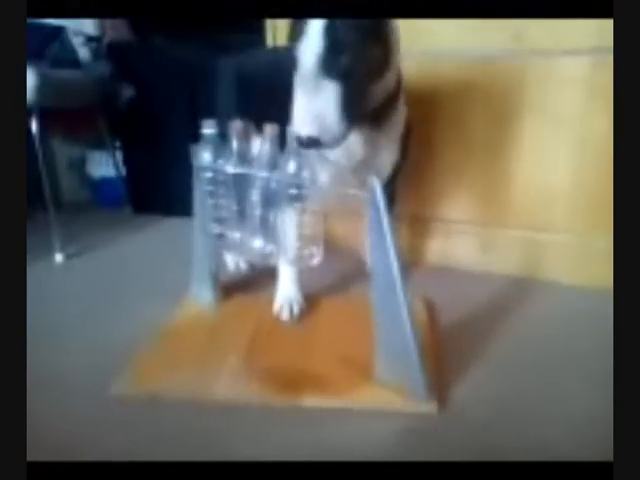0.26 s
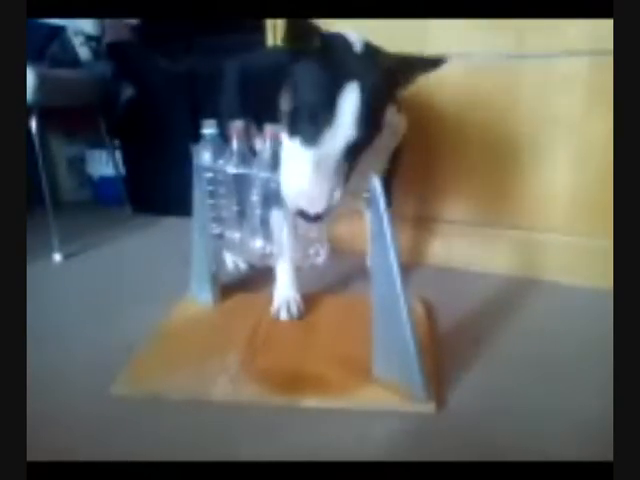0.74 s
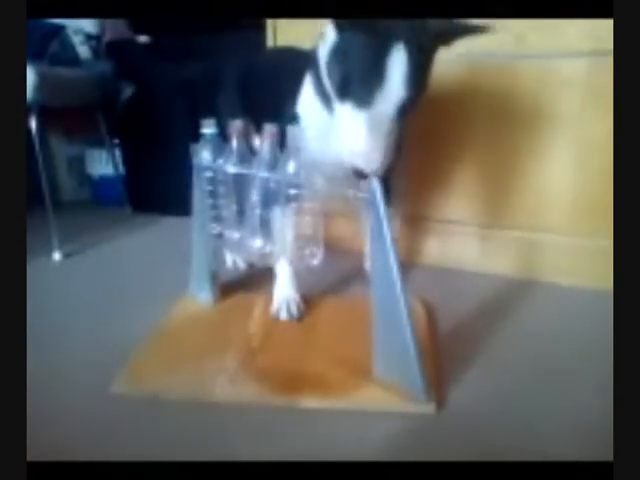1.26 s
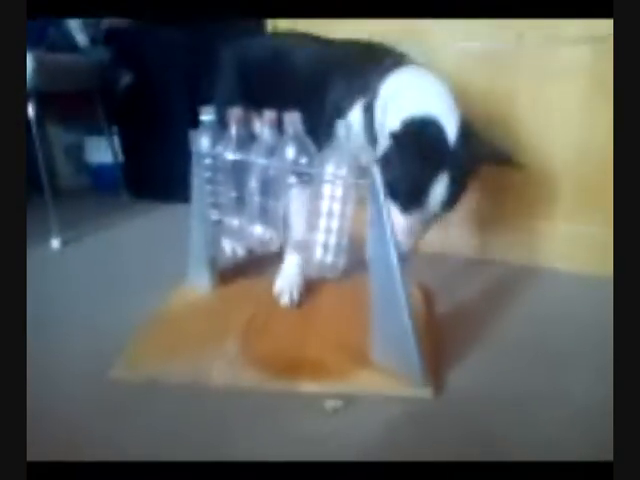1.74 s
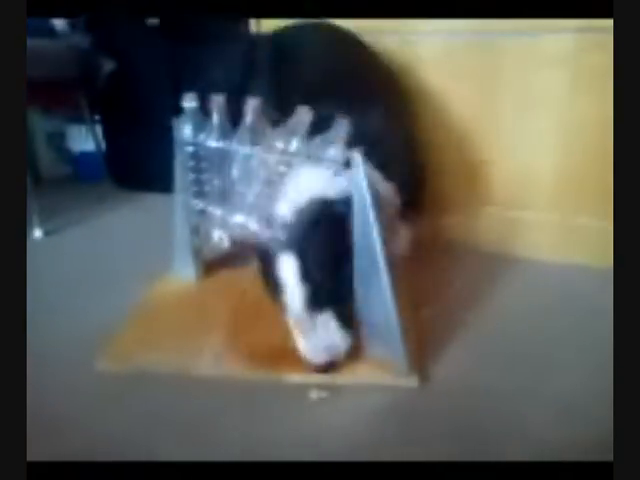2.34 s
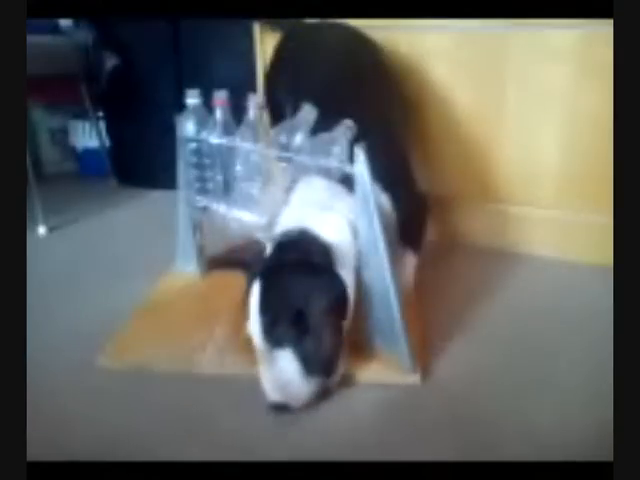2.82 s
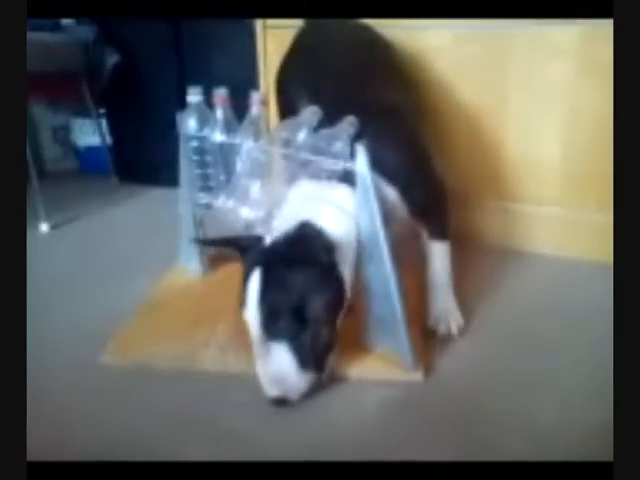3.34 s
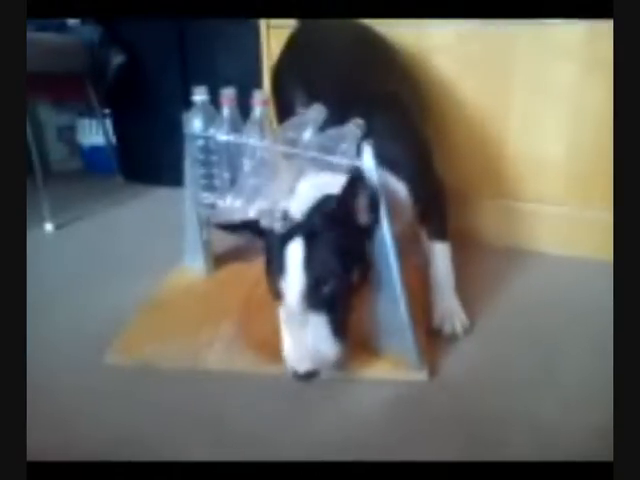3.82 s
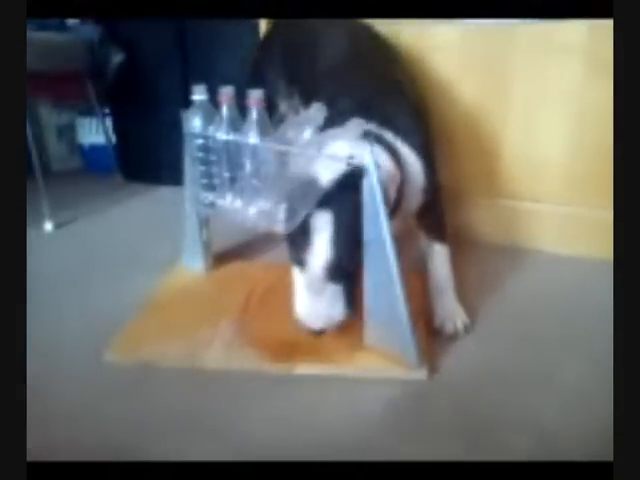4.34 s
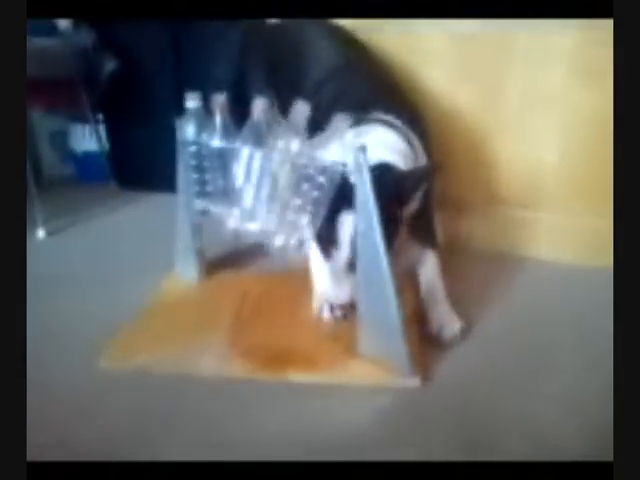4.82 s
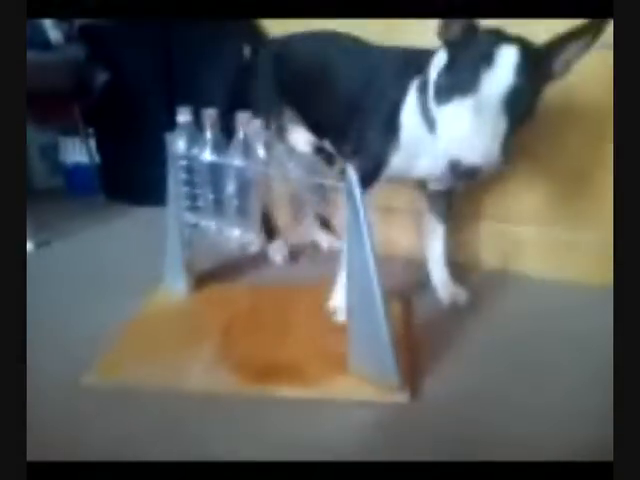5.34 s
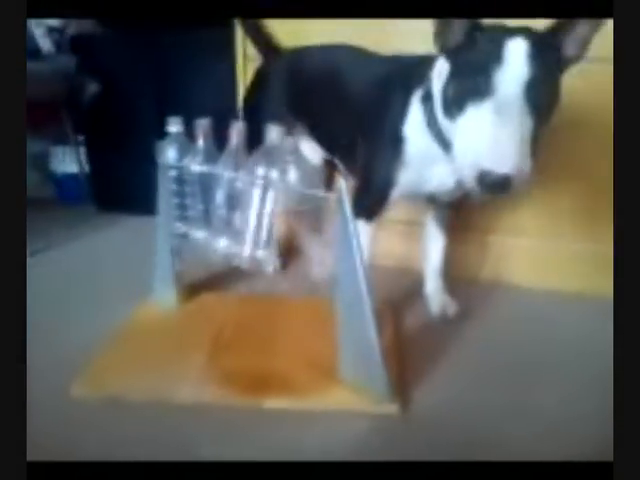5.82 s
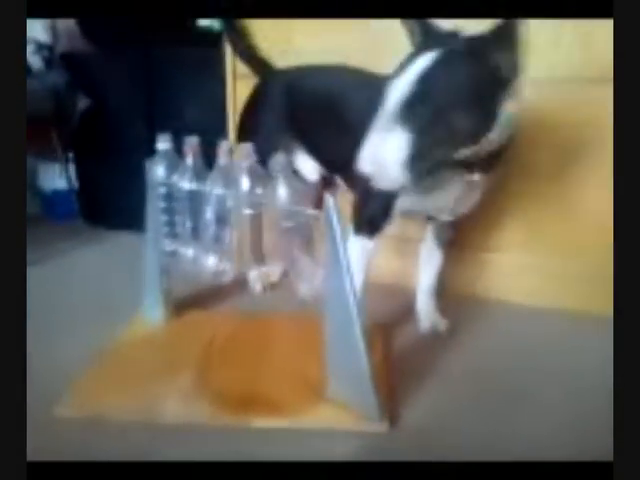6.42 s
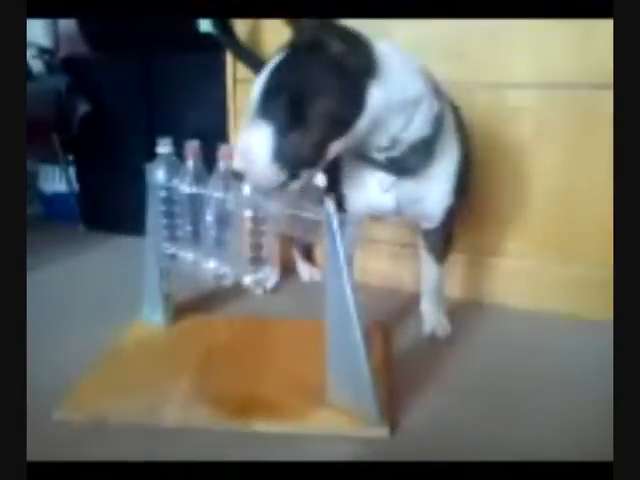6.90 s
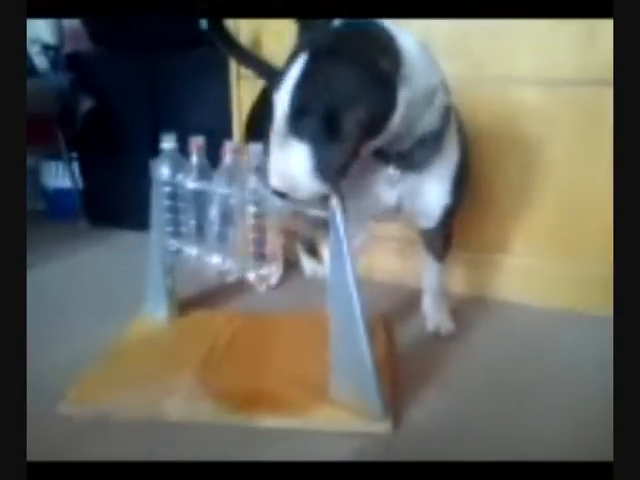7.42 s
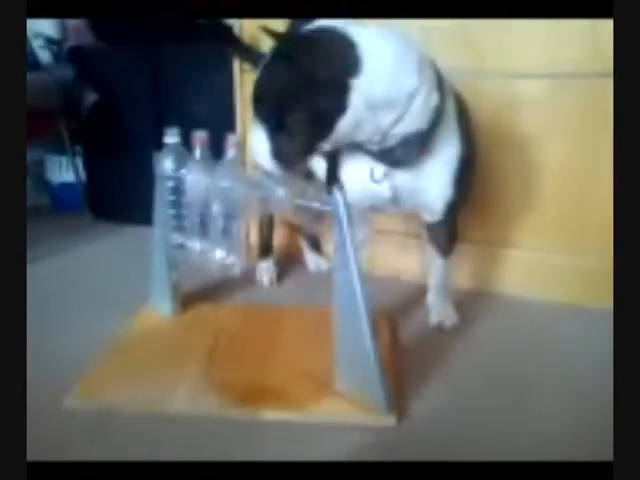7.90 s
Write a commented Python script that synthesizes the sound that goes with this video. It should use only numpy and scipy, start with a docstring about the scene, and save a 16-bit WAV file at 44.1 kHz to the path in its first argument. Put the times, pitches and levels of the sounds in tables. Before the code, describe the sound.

Empty plastic bottles knock and clatter on a metal rod as a dog pushes through, muffled and distorted, over low room drone in a small room.

```python
"""Dog among hanging bottles

A dog pushes through a row of empty plastic bottles hung on a metal rod, in a small room.
Thin shells knock (shaped noise plus one ringing mode), chatter on the rod (runs of taps into resonators)
and rub along the coat (hiss and ticks); the wooden base thumps (decaying sines). A low noise drone fills the room.
The narrow-band recorder overloads on the hardest knocks and turns itself down after them."""
import sys
import numpy as np
from scipy import signal
from scipy.fft import rfft, irfft
from scipy.io import wavfile
from scipy.ndimage import uniform_filter1d

SR = 44100
rng = np.random.default_rng(int(sys.argv[2]) if len(sys.argv) > 2 else 0)


def pcm_store(signal):
    """Save signal as 16-bit PCM."""
    levels = np.round(np.clip(np.atleast_2d(signal), -1, 1) * 32767)
    wavfile.write(sys.argv[1], SR, levels.astype(np.int16).T)


N = 359415


def gain_of(db):
    """Decibels to amplitude."""
    return 10 ** (np.asarray(db) / 20)


def evened(x):
    """Scales to an rms of one."""
    return x / np.sqrt(np.mean(x ** 2) + 1e-20)


def read(points, hz, axis=1):
    """One column of a spectrum table, joined by lines over log frequency."""
    table = np.array(points)
    return np.interp(np.log(hz + 1), np.log(table[:, 0] + 1), table[:, axis])


def level(curve):
    """A (time [s], level [dB]) curve as a gain for every sample."""
    return gain_of(np.interp(np.arange(N) / SR, *np.transpose(curve)))


def add(mix, start_s, sound):
    """Lays a sound into the mix at start_s, trimmed to the mix."""
    start = round(start_s * SR)
    sound = sound[max(-start, 0):]
    part = mix[max(start, 0):][:len(sound)]
    part += sound[:len(part)]


def coloured(x, points):
    """Filters x by a spectrum table, with zero phase."""
    hz = np.fft.rfftfreq(len(x), 1 / SR)
    return irfft(rfft(x) * gain_of(read(points, hz)), len(x))


def causal(x, db):
    """Filters x by a dB response at minimum phase, so it rings only after it is struck."""
    cepstrum = irfft(np.log(gain_of(db)))
    cepstrum[1:len(x) // 2] *= 2
    cepstrum[len(x) // 2 + 1:] = 0
    return irfft(rfft(x) * np.exp(rfft(cepstrum)))


def wander(per_s):
    """Slow random curve of unit rms, per_s corner points a second."""
    points = rng.standard_normal(int(N / SR * per_s) + 2)
    return evened(np.interp(np.arange(N) / SR * per_s, np.arange(len(points)), points))


# dull bumps on base or belly: (time [s], level [dB], frequency [Hz], decay to 1/e [s])
BUMPS = [(0.0, -18.5, 148.5, 0.12), (0.033, -4, 598, 0.011), (0.199, -13, 138, .04),
         (0.304, -7.5, 292, .025), (0.378, -1, 620, 0.012), (2.436, -10, 297, 0.03),
         (2.611, -0.5, 182, .012), (2.652, -4.5, 140.6, 0.05), (2.696, -6.5, 133.3, 0.035),
         (4.315, -11.5, 443.5, .022), (4.452, -14.5, 690, 0.012), (4.58, -24, 430, 0.083),
         (5.11, -19.5, 330, .02), (6.7, -21, 488, 0.029), (6.941, -16.5, 428, 0.037),
         (7.51, -26.5, 430, 0.059), (8.009, -15, 299, 0.018)]


def thumps(rise_s=0.00063):
    """The wooden base or a bottle's belly answers a push with a few low cycles."""
    out, t = np.zeros(N), np.arange(SR // 2) / SR
    for start_s, db, hz, decay_s in BUMPS:
        envelope = (1 - np.exp(-t / rise_s)) * np.exp(-t / decay_s)
        add(out, start_s, gain_of(db) * envelope * np.sin(2 * np.pi * hz * t))
    return out


# coat rubbing on plastic, relative: (time [s], level [dB])
RUB_LEVEL = [(0.0, -26), (0.2, -47), (0.38, -7.5), (0.58, -32), (0.85, -40), (1.18, -20), (1.45, -37.5),
             (2.4, -35), (2.65, -25), (3.13, -20), (3.35, -36), (4.3, -26.5), (4.5, -34.5), (5.4, -29.5),
             (5.8, -33.5), (6.9, -35.5), (7.27, -26.5), (7.6, -39.5)]
# relative rub spectrum: (frequency [Hz], density [dB per Hz])
RUB_SPECTRUM = [(100, -18.5), (400, 1.5), (800, -2), (1150, 3), (1600, 1), (2100, 0.5), (2700, -2.5),
                (3300, -9), (4000, -10)]
# short slides of a bottle along the dog: (time of peak [s], level [dB], half length to 1/e [s])
SLIDES = [(0.954, -20.5, 0.037), (2.427, -19.5, 0.0079), (3.53, -21, 0.057), (4.321, -20, 0.021),
          (4.378, -21.5, 0.034), (4.598, -23.5, 0.03), (5.114, -19.5, 0.0097), (6.394, -27, 0.057),
          (6.68, -43, 0.015), (7.086, -26, 0.016), (7.12, -20.5, 0.005), (7.577, -21, 0.025)]


def rub(rub_db=1, grains_per_s=220, grain_db=-5, spread_db=3, uneven_db=1):
    """Hair hisses over the plastic, with small random ticks where it catches; a slide swells it."""
    t = np.arange(N) / SR
    tick_gain = gain_of(spread_db * np.minimum(rng.exponential(1, N), 4))
    ticks = (rng.random(N) < grains_per_s / SR) * tick_gain
    hiss = rng.standard_normal(N) * gain_of(uneven_db * wander(per_s=26))
    friction = coloured(hiss + gain_of(grain_db) * evened(ticks), RUB_SPECTRUM + [(6000, -40.0)])
    slides = sum(gain_of(db) * np.exp(-((t - peak_s) / half_s) ** 2) for peak_s, db, half_s in SLIDES)
    return np.hypot(gain_of(rub_db) * level(RUB_LEVEL), slides) * evened(friction)


# rumble and tones together: (time [s], level [dB])
DRONE_LEVEL = [(0.2, -20), (0.6, -29), (0.85, -29), (1.2, -30), (2.0, -26.5), (2.8, -26.5), (3.1, -33.5),
               (3.4, -27), (4.33, -28), (4.44, -35), (4.65, -33.5), (5.25, -27), (5.55, -35.5), (6.05, -29),
               (7.05, -30.5), (7.35, -41), (7.9, -32.5), (8.15, -37.5)]
# relative rumble spectrum: (frequency [Hz], density [dB per Hz])
RUMBLE_SPECTRUM = [(15, -53.5), (30, -39.5), (57, -16), (88, -14), (112, 0), (138, 2.5), (185, -9),
                   (225, -8.5), (255, -7.5), (290, -10), (400, -14.5), (800, -15), (3000, -40.5)]
# faint tones before their fade: (mean frequency [Hz], level against the rumble [dB])
TONES = [(140, -11.5), (150, -14.5), (188, -9.5), (226, -12), (283, -10), (338, -24), (393, -17)]
# fall of the tones part way through: (time [s], level [dB])
TONE_FADE = [(2.5, 1.5), (3.2, -5)]
HUM_HZ, HUM_DB = 120.3, -40.5


def drone(rumble_db=0, tones_db=0, waver_db=4.0, drift_hz=1.2):
    """A low noise rumble with wavering, drifting tones in it, over a wavering mains hum."""
    sound = gain_of(rumble_db) * evened(coloured(rng.standard_normal(N), RUMBLE_SPECTRUM))
    fade = level(TONE_FADE)
    for hz, db in TONES:
        turns = np.cumsum(hz + drift_hz * wander(per_s=5)) / SR
        tone = evened(np.sin(2 * np.pi * turns) * gain_of(waver_db * wander(per_s=4)))
        sound += gain_of(tones_db + db) * fade * tone
    hum = evened(np.sin(2 * np.pi * HUM_HZ * np.arange(N) / SR))
    return level(DRONE_LEVEL) * sound + gain_of(HUM_DB + waver_db * wander(per_s=6)) * hum


# NUDGE_DB is over the rub level curve, give or take up to NUDGE_SPREAD_DB
NUDGES_PER_S, NUDGE_DB, NUDGE_SPREAD_DB = 6, 12, 5.5
NUDGE_BOOM_DB, NUDGE_SNAP_DB = -10.5, -20.5
NUDGE_LOW_HZ, NUDGE_HIGH_HZ = 654.6, 2680


def nudges(count=120):
    """Knock rows for light touches at random times, their strength following the rubbing."""
    draws = rng.random((count, 3))
    times_s = np.cumsum(-np.log(1 - draws[:, 0])) / NUDGES_PER_S
    scatter_db = NUDGE_SPREAD_DB * (2 * draws[:, 1] - 1)
    levels_db = np.interp(times_s, *np.transpose(RUB_LEVEL)) + NUDGE_DB + scatter_db
    modes_hz = NUDGE_LOW_HZ * (NUDGE_HIGH_HZ / NUDGE_LOW_HZ) ** draws[:, 2]
    return [(start_s, db, hz, NUDGE_BOOM_DB, NUDGE_SNAP_DB)
            for start_s, db, hz in zip(times_s, levels_db, modes_hz) if start_s < N / SR]


# bottles knocking together: (time [s], level before the crest allowance [dB], strongest shell mode [Hz],
# boom of the belly [dB], snap of the shoulder [dB])
CONTACTS = [(0.001, -7, 2110, -5, -12), (0.033, -9.5, 2180, -4, -19), (0.044, 0.5, 2167, -14, -21.5),
            (0.146, 1.5, 2100, -18.5, -22.5), (0.299, 3, 1110, -10.5, -20), (0.339, 1.5, 2623, -17, -10.5),
            (0.366, -5.5, 1143, -6, -17), (0.376, 0, 2530, -13.5, -11), (0.404, -0.5, 1224, -2, -20),
            (0.482, 2.5, 2030, -25, -15.5), (0.683, -19.5, 1660, -16, -19), (0.917, -13, 2570, -14, -19),
            (0.971, 4.5, 2520, -28.5, -13), (1.008, -1.5, 1540, -15.5, -16.5),
            (1.09, 1.5, 1566, -14, -15.5), (1.12, -7, 1566, -17, -39), (1.204, -6.5, 1704, -19.5, -22),
            (1.211, 0.5, 2500, -30, -18.5), (1.228, -7, 2620, -29, -20), (1.271, 0.5, 2390, -27.5, -7),
            (1.311, -7.5, 1630, -21.5, -13.5), (1.39, -9, 1524, -16, -18.5), (1.593, -17, 1107, 0, -31),
            (2.009, -20.5, 2200, -23, -21), (2.43, -5, 2110, -14.5, -29), (2.441, -2, 1990, -9, -26),
            (2.481, -7, 1054, -28, -28.5), (2.554, -15, 1210, -18, -42), (2.631, 0, 1256, -14, -27),
            (2.653, 3, 1244, -25, -20.5), (2.669, 0.5, 1486, -14.5, -28), (2.727, 0, 1864, -22, -16),
            (2.861, 4.5, 1159, -17, -24), (2.871, -1.5, 1950, -23, -22), (2.889, -5.5, 2120, -22.5, -24),
            (2.926, -4, 1094, -9, -27), (2.969, 1.5, 1394, -24.5, -25), (2.991, -2.5, 2010, -19, -23),
            (3.011, 2.5, 1945, -45, -25), (3.052, -7, 2026, -29, -23), (3.119, -1.5, 1533, -23, -22.5),
            (3.133, -1.5, 1084, -30, -26), (3.156, -3.5, 1213, -28, -28), (3.245, -8, 2000, -15.5, -43),
            (3.458, -12.5, 1196, -4, -13.5), (3.539, -4.5, 2023, -36, -11.5), (4.297, -11.5, 1590, -3, -13),
            (4.365, -12, 1140, -1, -29), (4.383, 0, 2404, -34, -8), (4.749, 2.5, 1820, -17.5, -8),
            (4.789, -7, 2700, -14, -11.5), (4.899, -14, 1960, -22, -23), (4.945, -8, 2530, -14.5, -10.5),
            (5.003, -12, 2600, -32, 0), (5.101, -12.5, 1184, -17, -17.5), (5.356, -1.5, 2450, -23.5, -10.5),
            (5.477, -9, 1167, -19, -8.5), (5.529, -2.5, 1110, -27, -25), (5.555, -1.5, 2020, -51.5, -20.5),
            (5.639, -12, 1134, -28, -36), (5.763, -10.5, 2100, -20, -19.5), (5.979, -10, 2990, -15, -3),
            (6.02, -12.5, 2860, -17, -10), (6.06, -16.5, 1680, -19, -24), (6.423, -14, 1740, -34, -14.5),
            (6.642, -13.5, 1083, -12.5, -51), (6.93, -9.5, 1810, -20, -26.5),
            (7.123, -2.5, 1630, -15.5, -12), (7.19, -1.5, 1605, -13.5, -3.5), (7.205, -3, 2410, -18, -17.5),
            (7.284, 2.5, 1518, -37, -20), (7.377, -5.5, 1223, -15.5, -13.5),
            (7.496, -14.5, 2660, -27.5, -12), (7.777, 1.5, 2517, -21, -11), (8.01, -2, 1394, -11, -25),
            (8.025, -2, 1520, -24, -16.5), (8.055, -2.5, 1126, -25, -24), (8.086, -2, 2000, -15, -19),
            (8.116, -2, 1926, -30, -21)]
# contact length at middling snap; shell mode level and cycles to 1/e
CONTACT_S, RING_DB, RING_CYCLES = 0.0068, 2, 11
# soft build-up before the knock: level against the knock, time to 1/e
LEAD_IN_DB, LEAD_IN_S = -13.5, 0.0065
# dB lost in length and in hollowness per dB of snap over the middling snap
MID_SNAP_DB, BRIEF_PER_SNAP, THIN_PER_SNAP = -17, 0.18, .3


def knocks(wall_db=-11, hollow_db=-12, rise_s=0.0014, flutter_db=-8, belly_share=0.34, flutter_s=.02,
           crinkle_db=4, crest_db=6, steadiness=0.75, size=8192):
    """Each contact is a brief crunch of the thin wall, which crinkles on while one shell mode rings out."""
    before_s = size // 8 / SR  # room for the soft build-up
    out, hz = np.zeros(N), np.fft.rfftfreq(size, 1 / SR)
    clock = np.arange(size) / SR - before_s
    t = np.maximum(clock, 0)
    onset = 1 - np.exp(-t / rise_s)
    lead_in = gain_of(LEAD_IN_DB) * np.exp(-abs(clock) / LEAD_IN_S) * (1 - onset)
    for start_s, db, mode_hz, boom_db, snap_db in list(CONTACTS) + nudges():
        grit, buckle = rng.standard_normal((2, size))
        # a blow on the belly booms; one on the stiff shoulder snaps, briefer and less hollow
        hardness_db = snap_db - MID_SNAP_DB
        length_s = CONTACT_S * gain_of(-BRIEF_PER_SNAP * hardness_db)
        press = onset * np.exp(-((t / length_s) ** 2) ** 2)
        wall = read([(40, boom_db - 40), (110, boom_db - 11), (220, boom_db - 2), (550, boom_db + 0.5),
                     (1100, hollow_db - THIN_PER_SNAP * hardness_db), (2000, wall_db),
                     (2900, snap_db + 0.74), (3800, snap_db - 1.5), (5000, snap_db - 18)], hz)
        shell = signal.hilbert(evened(irfft(rfft(grit) * gain_of(wall))))
        # while pressed, the wall swings at a nearly steady height
        pressed = evened(shell.real / (abs(shell) + 0.16) ** steadiness)
        # released, it springs back in uneven jerks, the more so after a booming blow
        jerks = evened(gain_of(crinkle_db * evened(uniform_filter1d(buckle, size=80))))
        release = (1 - np.exp(-t / length_s)) * np.exp(-t / flutter_s)
        flutter = gain_of(flutter_db + belly_share * boom_db) * jerks * release
        ring_decay = np.exp(-t * mode_hz / RING_CYCLES)
        ring = gain_of(RING_DB) * onset * ring_decay * np.sin(2 * np.pi * mode_hz * t)
        knock = pressed * press / press.max() + shell.real * (lead_in + flutter) + ring
        add(out, start_s - before_s, gain_of(db - crest_db) * knock)
    return out


# whole-bottle modes at tuning 1: (frequency [Hz], width [Hz], level [dB])
BOTTLE_MODES = [(426, 14, -2), (810, 51, -20.5), (1142, 43, 6.5), (1640, 39, -2.5), (1990, 37, -3),
                (2065, 28, 6.5), (2390, 92, -15.5), (2570, 41, -27)]


def bottle(x, upper_db=0, tuning=1, split_hz=1750):
    """A whole bottle driven by x: parallel resonators, those above split_hz offset by upper_db."""
    out = 0
    for hz, width_hz, db in BOTTLE_MODES:
        mode = signal.lfilter(*signal.iirpeak(hz * tuning, hz / width_hz, SR), x)
        out = out + gain_of(db + upper_db * (hz > split_hz)) * mode
    return out


# TUNING_STEP: ratio offset between neighbours
TUNING_STEP, SWAPS_PER_S = 0.037, 60


def bottle_row(x, upper_db=0, tuning=1, count=3):
    """Differently tuned neighbours take the drive x in random turns, so the ring keeps shifting."""
    turn = (np.arange(len(x)) / SR * SWAPS_PER_S).astype(int)
    touched = rng.integers(count, size=N // 100)[turn]
    out = 0
    for k in range(count):
        detune = 1 + TUNING_STEP * (k - (count - 1) / 2)
        out = out + bottle(x * (touched == k), upper_db, tuning * detune)
    return out


# bottle chattering on the rod: (time [s], level [dB], length to 1/e [s],
# upper modes against lower [dB], tuning [ratio])
CHATTERS = [(0.01, -22, 0.24, 2, 1.02), (0.32, -14, 0.14, -1, 1.04), (0.487, -12, 0.061, 24, .98),
            (0.97, -21.5, 0.022, 21, .96), (1.212, -14, 0.085, 21, 1.2), (1.978, -30.5, .07, 21.5, 1.05),
            (2.443, -17, 0.051, 15.5, 1.04), (2.682, -12.5, 0.12, 12, .94), (2.89, -11, 0.054, 31, 1),
            (2.997, -14.5, 0.16, 40, 1.03), (3.115, -16.5, 0.15, 4, .99), (5.529, -17, 0.021, 2.5, 1.0),
            (5.56, -20.5, 0.078, 8, 1.02), (5.766, -19, 0.033, 18, 1.01), (6.647, -28.5, 0.038, -13.5, .95),
            (8.088, -11.5, 0.062, 15, 1.03)]


def rattles(taps_per_s=150, spread_db=3, click_db=-14, size=22050):
    """A bottle bounces on the rod in a quick, uneven, dying run of taps."""
    out, t = np.zeros(N), np.arange(size) / SR
    click_spectrum = [(100, -13), (500, -10.5), (3000, -16), (6000, -35.5)]
    for start_s, db, length_s, upper_db, tuning in CHATTERS:
        gaps, force = rng.uniform(.3, 1.7, 100), rng.standard_normal(100)
        at = ((np.cumsum(gaps) - gaps[0]) / taps_per_s * SR).astype(int)
        strength = np.sign(force) * gain_of(spread_db * abs(force))
        taps = np.bincount(at, strength, size)[:size] * np.exp(-(t / length_s) ** 2)
        clicks = gain_of(click_db) * coloured(taps, click_spectrum)
        ring = bottle_row(taps, upper_db, tuning) + clicks
        # set the energy by level and length
        add(out, start_s, gain_of(db) * ring * np.sqrt(length_s * SR / np.sum(ring ** 2) / 2))
    return out


# reverberation: (frequency [Hz], t60 [s], level [dB])
REVERB = [(150, 0.38, -0.5), (430, 0.16, 6.5), (1140, 0.36, -4.5), (2100, 0.12, -3), (3200, 0.32, -4.5)]


def room(x, first_s=.005, size=256):
    """Dense reflections from near walls; two noise tails crossfade as the bottles swing."""
    out, swing = np.zeros(N), np.arange(N) / SR * 2 * np.pi  # one turn a second
    for weight in (np.cos(swing), np.sin(swing)):
        hz, t, z = signal.stft(rng.standard_normal(SR), SR, nperseg=size)
        t60_s = read(REVERB, hz)[:, None]
        decay = np.exp(-np.log(1000) * t / t60_s)
        unit_energy = np.sqrt(2 * np.log(1000) / (t60_s * SR))
        z *= gain_of(read(REVERB, hz, axis=2)[:, None]) * decay * unit_energy
        tail = np.r_[np.zeros(int(first_s * SR)), signal.istft(z, SR, nperseg=size)[1]]
        out += signal.fftconvolve(x * weight, tail)[:N]
    return out


def scene(ring_db=-10, rattle_wet_db=-4):
    """Knocks set the bottles ringing, and the room answers knocks and chatter."""
    hits, chatter = knocks(), rattles()
    hits = hits + gain_of(ring_db) * bottle_row(hits)
    reverb = room(hits + gain_of(rattle_wet_db) * chatter)
    return (hits + chatter + thumps() + reverb + rub() + drone())[None]


# DUCK_SHARE: part of the excess over the threshold taken off
DUCK_ABOVE_DB, DUCK_SHARE, DUCK_ATTACK_S, RECOVER_DB_PER_S = -15.5, 0.43, 0.041, 25


def gain_control(x, size=220):
    """Turns down just after a loud knock and creeps back up, so the background sinks behind each clatter."""
    power = signal.lfilter(np.ones(size) / size, 1, x[0] ** 2)
    excess_db = np.maximum(10 * np.log10(power + 1e-12) - DUCK_ABOVE_DB, 0)
    recovery_db = np.arange(N) / SR * RECOVER_DB_PER_S
    # running maximum on a rising ramp: instant hold, linear recovery
    cut_db = np.maximum.accumulate(DUCK_SHARE * excess_db + recovery_db) - recovery_db
    lag = np.exp(-1 / (DUCK_ATTACK_S * SR))
    return x * gain_of(-signal.lfilter([1 - lag], [1, -lag], cut_db))


# recorder's voice band: (frequency [Hz], response [dB])
VOICE_RESPONSE = [(20, -5), (3000, 0.5), (3400, -4.5), (3700, -13.5), (4100, -19.5), (4500, -12.5),
                  (4900, -12.5), (5400, -39), (7000, -80.5)]
EDGE_HZ = 16000


def record(dry, overload=0.99, size=2048):
    """Slow gain control, input overload, narrow voice band, full-scale clipping, then the band limit."""
    squeezed = np.clip(gain_control(dry), -overload, overload)
    response_db = read(VOICE_RESPONSE, np.fft.rfftfreq(size, 1 / SR))
    band = causal(signal.unit_impulse(size), response_db)
    clipped = np.clip(signal.oaconvolve(squeezed, band[None])[:, :N], -1, 1)
    band_limit = signal.firwin(255, EDGE_HZ, window=("kaiser", 9), fs=SR)
    return signal.oaconvolve(clipped, band_limit[None], "same")


dry = scene()
out = record(dry)
pcm_store(out)
```